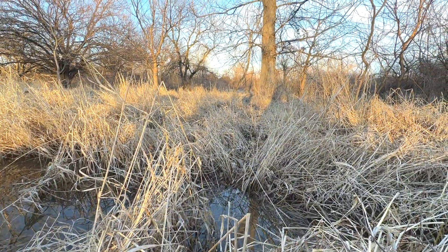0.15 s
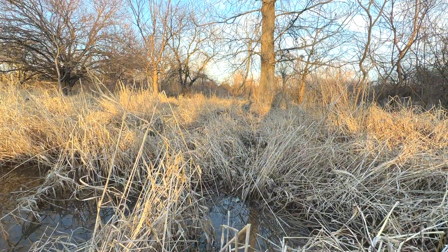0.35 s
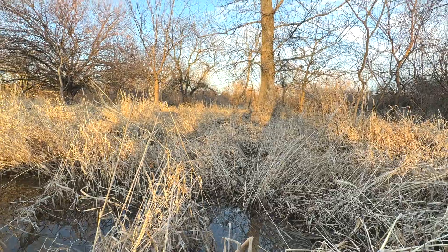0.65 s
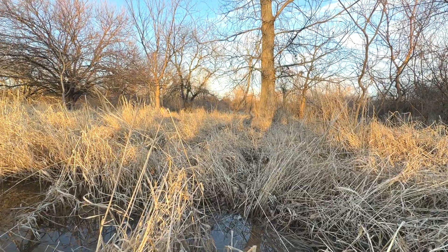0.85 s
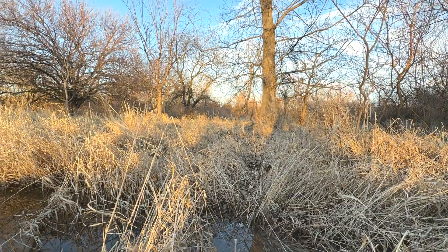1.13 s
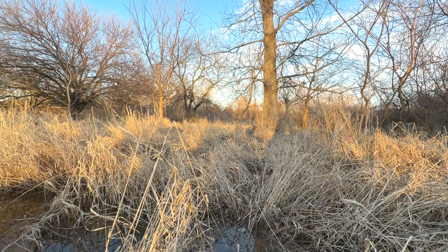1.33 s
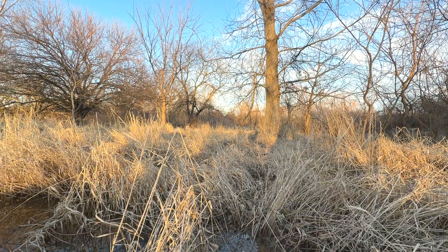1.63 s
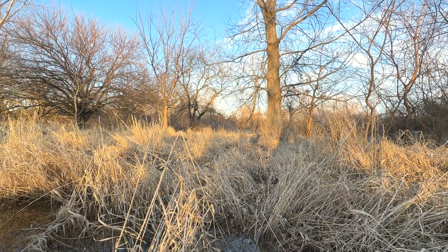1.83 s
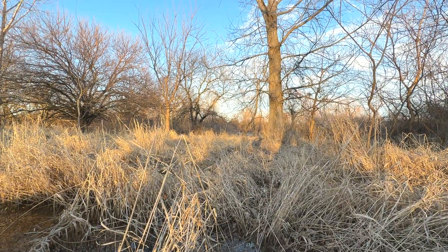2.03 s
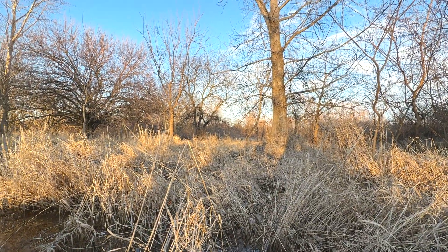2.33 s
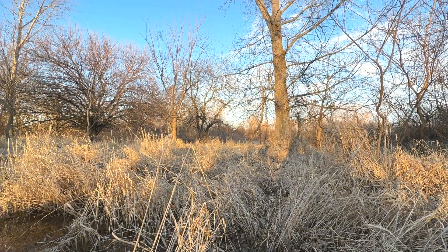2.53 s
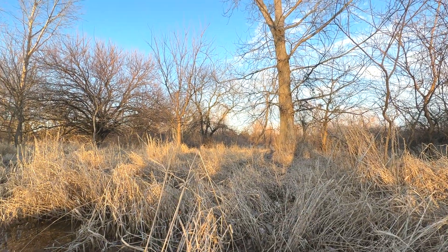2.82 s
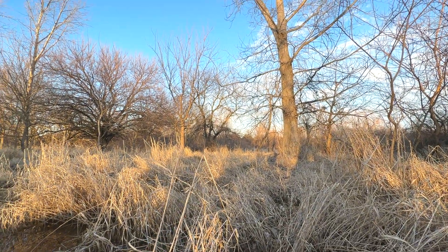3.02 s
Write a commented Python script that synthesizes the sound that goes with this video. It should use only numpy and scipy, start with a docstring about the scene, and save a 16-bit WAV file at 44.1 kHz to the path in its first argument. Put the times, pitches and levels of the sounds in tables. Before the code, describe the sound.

Small frogs trill in overlapping pulsing runs over a distant chorus in a dry, grassy marsh

```python
"""Small frogs trill in overlapping runs of pulses, mostly to the left, over a farther chorus, in an early spring marsh.
Each pulse is a short swelling tone whose pitch sags; echoes blur the far trills together.
Dry grass rustles and snaps close by (bursts of noise), stems tick, and a small bird gives thin arched chips.
Under it all lie a low rumble and distant traffic, made of coloured noise, and a faint steady hum."""
import sys
import numpy as np
from scipy import signal
from scipy.fft import rfft, irfft
from scipy.io import wavfile
from scipy.ndimage import uniform_filter1d

SR = 44100
rng = np.random.default_rng(int(sys.argv[2]) if len(sys.argv) > 2 else 0)


def transcribe(u):
    """Save the signal u as a 16-bit wav file named by the first command-line argument.

    u: samples, shape (n,) or (channels, n), limited to [-1, 1]; the rate is SR.
    q: integer samples, one column per channel.
    """
    v = np.clip(np.atleast_2d(u).T, -1, 1)
    q = np.round(v * 32767).astype(np.int16)
    wavfile.write(sys.argv[1], SR, q)


N = 139797  # length of the scene in samples


def undb(db):
    """Turn decibels into a plain gain."""
    return 10 ** (np.asarray(db) / 20)


def unit(x):
    """Scale to an rms of 1."""
    return x / np.sqrt(np.mean(x ** 2) + 1e-30)


def pan(db):
    """Left and right gains for a level difference; positive leans left."""
    return undb(np.array([[db], [-db]]) / 2)


def add(out, start_s, sound):
    """Mix a sound in at a time, dropping whatever falls outside the scene."""
    i = int(start_s * SR)
    a, b = max(i, 0), min(i + sound.shape[-1], N)
    if b > a:
        out[..., a:b] += sound[..., a - i:b - i]


def over_hz(points):
    """Join (Hz, value) points on a log-frequency axis."""
    hz, value = np.array(points, float).T
    return np.interp(np.log(np.fft.rfftfreq(N, 1 / SR) + 1), np.log(hz), value)


def walk(count):
    """Smooth chance with an rms of 1, changing about count times a second."""
    width = SR // count
    smoothed = uniform_filter1d(rng.standard_normal(N), width)
    return unit(uniform_filter1d(smoothed, width))


def echoes(x, t60_s, wet_db):
    """Add a diffuse tail of noise that falls 60 dB in t60_s, different at each ear."""
    t = np.arange(SR // 2) / SR
    tail = rng.standard_normal((2, len(t))) * undb(-60 * t / t60_s) * (t > .003)
    tail /= np.sqrt(np.sum(tail ** 2, axis=1, keepdims=True))
    return x + undb(wet_db) * signal.fftconvolve(x, tail, axes=1)[:, :N]


def at_ports(noises, spectrum, ports):
    """Colour two unrelated noises and give them the balance, likeness and phase of two microphone ports."""
    balance_db, likeness, phase = (over_hz([(row[0], row[k]) for row in ports])
                                   for k in range(1, len(ports[0])))
    likeness, balance = np.clip(likeness, 0, 1), undb(balance_db / 2)
    left, other = rfft(noises)
    # the right port shares part of the left noise, shifted in phase
    right = likeness * left * np.exp(-1j * phase) + np.sqrt(1 - likeness ** 2) * other
    colour = unit(undb(over_hz(spectrum)))
    return irfft(np.array([left * balance, right / balance]) * colour, N)


# colour of the background noise: pitch_hz, relative_level_db (per Hz)
AIR_COLOUR = [(22, -18), (30, -29), (39, -6), (58, 2.5), (75, 0), (110, -3), (140, -3.5), (230, -6),
              (310, -11.5), (390, -23), (600, -22), (950, -17.5), (1280, -17), (1700, -20.5), (2150, -29),
              (3700, -36), (4500, -39.5), (6000, -38.5), (8500, -46.5), (11000, -59.5), (16000, -70)]
# background at the two ports: pitch_hz, left_over_right_db, likeness (0-1), phase_rad
AIR_AT_PORTS = [(63, -1, 0.68, 0.), (251, -1.5, 0.9, 0.57), (430, -3, 0.25, 1.), (586, 2, 0.95, 2),
                (930, 4, 0.73, 2), (1420, 5, 0.2, 4), (2160, 3, 0.52, 5.5), (4630, 12.5, 0, 4),
                (8240, 14.5, 0.58, 4), (10700, -4, 0, 6)]
# slow swells, on top of AIR_DB: time_s, rumble_db, middle_db, treble_db
AIR_SWELLS = [(0., 2, -2.5, -4.5), (.39, 1, -2, -2.5), (.46, 6.5, 2, -1), (.8, 3, 1.5, 1),
              (1.05, 1.5, 2, -1), (1.501, -0.5, 2.5, -1.5), (1.9, -0.5, 4.5, -1.5), (2.25, -0.5, 4, -2.5),
              (2.7, -0.5, 1.5, -5), (3.17, -0.5, 0, -2.5)]
# steady hum tones: pitch_hz, level_db
HUM_TONES = [(60, -59), (301, -65.5)]
AIR_DB = -46.5
RUMBLE_EDGE_HZ, TREBLE_EDGE_HZ = 440, 1300


def background():
    """Low rumble, far traffic and a thin hiss, each noise band swelling slowly, and a faint hum."""
    t, hz = np.arange(N) / SR, np.fft.rfftfreq(N, 1 / SR)
    air = rfft(at_ports(rng.standard_normal((2, N)), AIR_COLOUR, AIR_AT_PORTS))
    rumble, below_treble = (1 / (1 + (hz / edge) ** 6) for edge in (RUMBLE_EDGE_HZ, TREBLE_EDGE_HZ))
    bands = (rumble, below_treble - rumble, 1 - below_treble)
    times, *levels = np.array(AIR_SWELLS).T
    # each hum tone wanders slightly in phase
    out = sum(undb(db) * np.sin(2 * np.pi * tone_hz * t + .5 * walk(3)) for tone_hz, db in HUM_TONES)
    for band, band_db in zip(bands, levels):
        out = out + irfft(air * band, N) * undb(AIR_DB + np.interp(t, times, band_db))
    return out


# overtones of a frog pulse: ratio (to the pitch), level_db
PULSE_PARTIALS = [(1, 0), (1.5, -20.5), (1.95, -27)]
PULSE_RISE_S, PULSE_SHARPNESS = .003, 3.6
PULSE_SAG_HZ_PER_S, PULSE_SCATTER_DB, PULSE_SCATTER_HZ = 26000, 1, 25
LOUDER_DB, LOUDER_REACH_S = 2, .005


def trill(start, length, gap, growth, first_hz, last_hz, first_db, last_db, louder_at=()):
    """A run of short pulses of the vocal sac; each swells, sags in pitch and dies away."""
    out, t = np.zeros(N), np.arange(SR // 60) / SR
    swell = (t / PULSE_RISE_S * np.exp(1 - t / PULSE_RISE_S)) ** PULSE_SHARPNESS
    for k, (loud, sharp) in enumerate(rng.standard_normal((40, 2))):
        at = k * gap + growth * k * (k - 1) / 2  # the gap changes by growth at every pulse
        if at > length or at < 0:
            break
        hz = first_hz + (last_hz - first_hz) * at / length + PULSE_SCATTER_HZ * sharp
        db = first_db + (last_db - first_db) * at / length + PULSE_SCATTER_DB * loud
        db += LOUDER_DB * any(abs(start + at - moment) < LOUDER_REACH_S for moment in louder_at)
        phase = 2 * np.pi * np.cumsum(hz - PULSE_SAG_HZ_PER_S * (t - PULSE_RISE_S)) / SR
        tone = sum(undb(part_db) * np.sin(ratio * phase) for ratio, part_db in PULSE_PARTIALS)
        add(out, start + at - PULSE_RISE_S, undb(db) * swell * tone)  # the swell peaks on time
    return out


# waves of far trills: start_s, length_s, first_pitch_hz, last_pitch_hz, level_db (before echoes and pan)
FAR_WAVES = [(-.3, 0.85, 3030, 2667, -51), (0.419, 1.31, 2830, 3207, -50.5), (1.748, 0.94, 2713, 3106, -51),
             (2.699, 0.52, 2916, 3240, -52)]
FAR_STAGGER_S, FAR_SPREAD_HZ, FAR_GAP_S = .06, 193, .05
FAR_PAN_DB, FAR_T60_S, FAR_WET_DB = 7, .27, 1


def far_frogs():
    """Waves of five distant trills each, on alternate sides, blurred by echoes into a chorus."""
    out = np.zeros((2, N))
    for start, length, first_hz, last_hz, db in FAR_WAVES:
        for k, (when, pitch, pace) in enumerate(rng.standard_normal((5, 3))):
            own_start = start + FAR_STAGGER_S * when
            own_gap = FAR_GAP_S * np.exp(.15 * pace)
            own_hz = FAR_SPREAD_HZ * np.tanh(pitch)
            out[k % 2] += trill(own_start, length, own_gap, 0, first_hz + own_hz, last_hz + own_hz, db, db)
    return pan(FAR_PAN_DB) * echoes(out, FAR_T60_S, FAR_WET_DB)


# bird chips: middle_s, top_pitch_hz, level_db (before BIRD_DB, pan and echoes)
BIRD_CHIPS = [(1.83, 5450, -66), (1.94, 5470, -68), (2.104, 5470, -62.5), (2.264, 5700, -60.5),
              (2.398, 5720, -60.5), (2.564, 5750, -59.5), (2.748, 5560, -64), (2.883, 5780, -59)]
BIRD_DB, BIRD_PAN_DB, TREES_T60_S, TREES_DB = -2.5, 6.5, .35, -4
CHIP_S, CHIP_ARCH_HZ, CHIP_WAVER_HZ = .046, 950, 65
UPPER_VOICE_RATIO, UPPER_VOICE_DB = 1.5, -13


def bird():
    """Two-voiced chips whose pitch arches up and down, echoing among the trees."""
    out, u = np.zeros(N), np.linspace(-1, 1, int(CHIP_S * SR))  # u runs from -1 to 1 over a chip
    for middle, top_hz, db in BIRD_CHIPS:
        arch_hz = top_hz - CHIP_ARCH_HZ * np.abs(u) * u ** 2
        waver_hz = CHIP_WAVER_HZ * walk(900)[:len(u)]
        phase = 2 * np.pi * np.cumsum(arch_hz + waver_hz) / SR
        voices = np.sin(phase) + undb(UPPER_VOICE_DB) * np.sin(UPPER_VOICE_RATIO * phase)
        add(out, middle - CHIP_S / 2, undb(db + BIRD_DB) * (1 - u ** 2) * voices)
    return echoes(out * pan(BIRD_PAN_DB), TREES_T60_S, TREES_DB)


# light ticks of stems farther off: start_s, ring_pitch_hz, level_db (on the left, before the decay)
TICKS = [(0.131, 6040, -57), (1.135, 6150, -46.5), (2.183, 5840, -46), (2.331, 5800, -50),
         (2.995, 6240, -51.5), (3.072, 5600, -45)]
STEM_DECAY_S, STEM_WIDTH_HZ, STEM_PAN_DB = .0017, 1260, 25


def stems():
    """Stems knock together to the left, each with a short, broad ring of filtered noise."""
    out, t = np.zeros(N), np.arange(SR // 40) / SR
    hz = np.fft.rfftfreq(len(t), 1 / SR)
    for at, ring_hz, db in TICKS:
        resonance = 1 / (1 + ((hz - ring_hz) / STEM_WIDTH_HZ) ** 2)
        ring = irfft(rfft(rng.standard_normal(len(t))) * resonance, len(t))
        add(out, at, undb(db) * unit(ring) * np.exp(-t / STEM_DECAY_S))
    return out * undb(np.array([[0], [-STEM_PAN_DB]]))


# bouts of grass rustle: start_s, length_s, level_db (before flicker and balance)
RUSTLE_BOUTS = [(.42, 2.6, -82), (0.422, 0.1, -64.5), (0.774, 0.31, -66.5), (1.286, 0.093, -73.5),
                (1.428, 0.7, -65.5), (1.628, 0.057, -59.5), (1.92, 0.13, -62.5), (3.034, 0.16, -72)]
# stalks snapping: time_s, peak_level_db (before the noise and balance)
STALK_SNAPS = [(0.4546, -47.5), (0.509, -54), (0.5648, -47), (1.115, -53), (1.185, -61), (1.483, -49),
               (1.5035, -43.5), (1.522, -45.5), (1.546, -50), (1.621, -48), (1.7088, -50), (1.779, -60),
               (1.919, -44.5), (1.946, -52), (1.9858, -45), (2.163, -54), (2.3307, -61), (2.702, -72),
               (2.8158, -44), (2.8289, -39.5), (2.926, -59), (3.07, -63), (3.131, -55), (3.156, -48.5)]
# colour of dry grass: pitch_hz, relative_level_db (per Hz)
GRASS_COLOUR = [(1500, -2), (3500, -1), (5500, 0), (7500, -5.5), (9000, 2), (10500, 0), (12700, 1),
                (14500, 7), (16000, 6)]
# grass at the two ports: pitch_hz, left_over_right_db, likeness (0-1), phase_rad
GRASS_AT_PORTS = [(4040, 7, 0, -21), (7100, 22, 0, -3), (9300, -1, 0, 0.7), (10760, 0, 1, -3),
                  (13930, 0, 0.83, -5), (14600, -4, 1, -13), (16300, 12, 0.9, 0.5)]
RUSTLE_EDGE_S, RUSTLE_FLICKER_DB, SNAP_DECAY_S = .019, 4., .0032
FIBRES_PER_S, FIBRE_SCATTER_DB = 730, 2.5


def grass():
    """Dry fibres tick densely in uneven bouts and stalks snap: noise shaped by many brief decays."""
    t = np.arange(N) / SR
    fibre_db = FIBRE_SCATTER_DB * np.minimum(rng.exponential(size=N), 6)
    ticks = (rng.random(N) < FIBRES_PER_S / SR) * undb(fibre_db)
    # the energy of each tick dies away over about 1.3 ms
    energy = signal.lfilter([1], [1, -np.exp(-1 / (.0013 * SR))], ticks ** 2)
    crackle = unit(np.sqrt(energy))
    bouts = np.zeros(N)
    for at, length, db in RUSTLE_BOUTS:
        ramp = np.minimum(t - at, at + length - t) / RUSTLE_EDGE_S + .5
        bouts += undb(db) * np.clip(ramp, 0, 1)
    force = bouts * crackle * undb(RUSTLE_FLICKER_DB * walk(70))
    for at, db in STALK_SNAPS:
        add(force, at, undb(db) * np.exp(-t[:SR // 20] / SNAP_DECAY_S))
    return at_ports(force * rng.standard_normal((2, N)), GRASS_COLOUR, GRASS_AT_PORTS)


# near frog trills: start_s, length_s, first_gap_s, gap_growth_s (per pulse), first_pitch_hz, last_pitch_hz,
# first_level_db, last_level_db (both before FROG_DB and echoes), left_over_right_db
NEAR_TRILLS = [(.027, .13, .057, -.003, 3190, 3320, -39, -41, 9),
               (.0426, .77, .05938, .000521, 2820, 2930, -46, -40, 6),
               (.2223, .71, .03969, .00042, 2600, 3000, -42, -40, 6),
               (.442, .25, .046, -.0008, 2780, 2880, -42, -42, 6),
               (.5025, .72, .05705, .002881, 2830, 3090, -41, -41, 11),
               (.7555, .71, .04567, .000569, 2940, 3020, -43, -43, 13),
               (.8384, .54, .06221, -.001197, 3030, 3120, -43, -40, 15),
               (1.213, .59, .05212, -.00005, 3130, 3120, -43.5, -42, 15),
               (1.245, .32, .055, .0034, 3110, 3180, -41, -41, 17),
               (1.623, .39, .0655, -.0008, 3200, 3300, -42, -42, 16),
               (1.582, .31, .049, 0., 2780, 2720, -45, -44, 10),
               (1.7954, .86, .04112, .000358, 2730, 3060, -43, -44, 10),
               (2.0071, .74, .06597, -.000165, 2860, 3100, -41, -44, 12),
               (2.111, .38, .0585, .001, 2850, 2920, -43, -45, 10),
               (2.6649, .52, .04638, .000758, 2760, 2740, -47, -43, 9),
               (2.8252, .35, .05569, -.0002, 3200, 3360, -48, -46, 13)]
# moments at which near trill pulses sound louder: time_s
LOUDER_MOMENTS = [.469, .551, .597, .656, .682, .814, .992, 1.184, 1.421, 1.63, 1.69, 1.815, 2.205, 3.11]
FROG_DB, REED_T60_S, REED_DB = 1.5, .07, -10


def near_frogs():
    """Single frogs to the left, scattered by the reeds; they reach the two ports in opposite phase."""
    dry = np.zeros((2, N))
    for *row, side_db in NEAR_TRILLS:
        sides = np.array([[1], [-undb(-side_db)]])
        dry += trill(*row, louder_at=LOUDER_MOMENTS) * sides
    return undb(FROG_DB) * echoes(dry, REED_T60_S, REED_DB)


def scene():
    """Frogs, bird, stems and grass over the background."""
    return background() + far_frogs() + bird() + stems() + grass() + near_frogs()


TOP_HZ = 15900


def record(dry):
    """The recorder cuts the top with a steep low-pass filter."""
    return signal.sosfilt(signal.ellip(10, .2, 70, TOP_HZ, fs=SR, output="sos"), dry)


dry = scene()
out = record(dry)
transcribe(out)
```